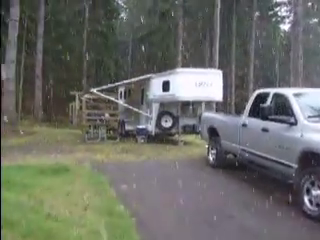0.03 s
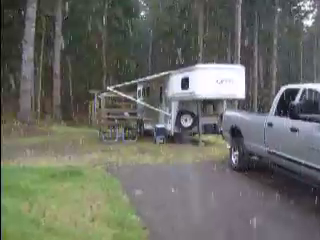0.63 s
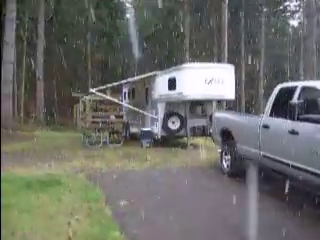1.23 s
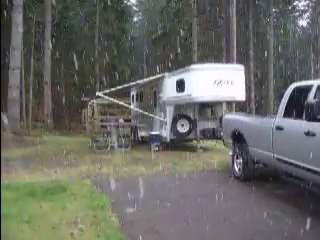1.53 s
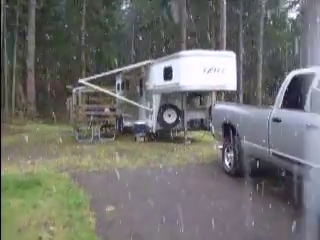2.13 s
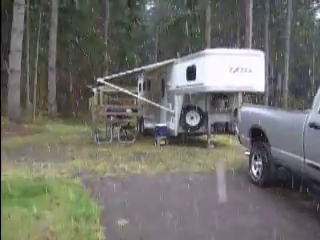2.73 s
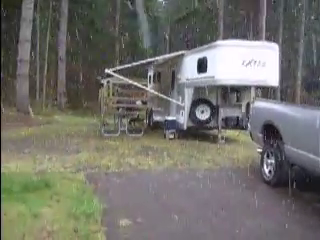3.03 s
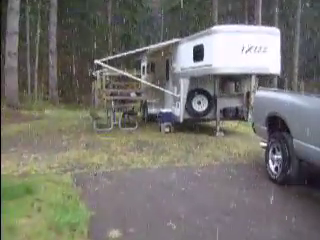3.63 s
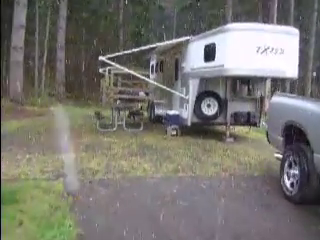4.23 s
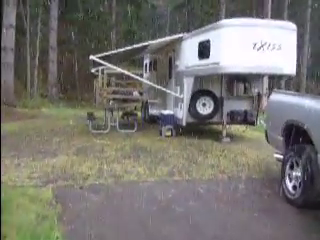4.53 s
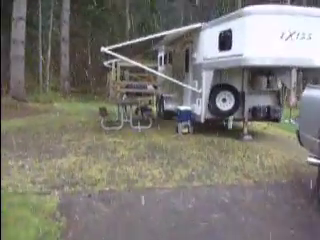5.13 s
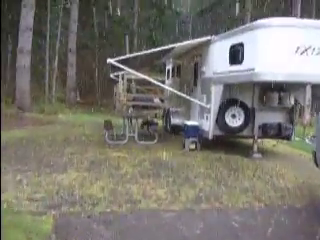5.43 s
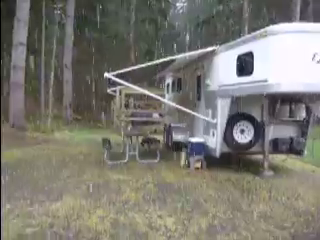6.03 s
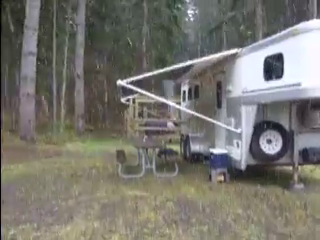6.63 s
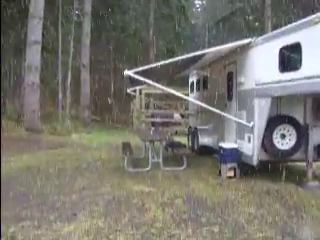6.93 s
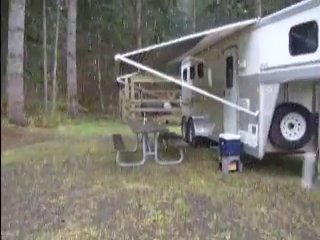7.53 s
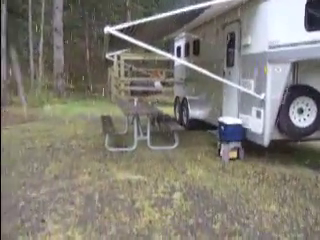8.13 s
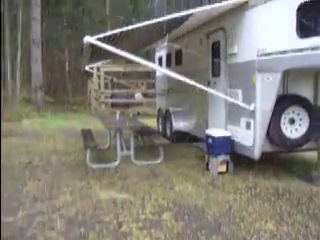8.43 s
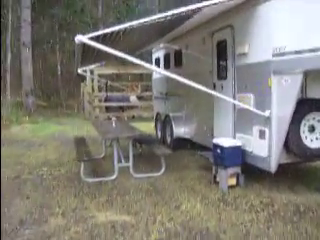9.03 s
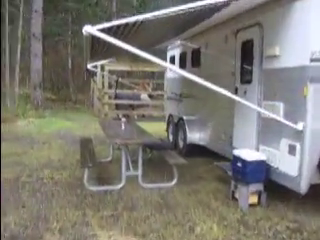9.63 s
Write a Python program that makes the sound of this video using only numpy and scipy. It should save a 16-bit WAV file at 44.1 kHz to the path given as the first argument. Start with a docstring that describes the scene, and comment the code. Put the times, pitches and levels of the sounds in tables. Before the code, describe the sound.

Sharp, irregular drips strike the microphone amid soft pops, rumbling gusts and short spells of light rain hiss.

```python
"""Rain at a camp in wet woods, heard through a hand-held camcorder that is itself getting wet.
Drops crack on its housing and make it ring, and puffs of air rumble on the microphone.
The sound cuts in with a soft pop, or when a tap or gust opens the noise gate, and sags out again.
So the rain, the hiss and part of the motor's whine come in short spells over a faint steady noise.
Late on, a quiet hum swells and fades."""
import sys
import numpy as np
from scipy import signal
from scipy.fft import rfft, irfft
from scipy.io import wavfile
from scipy.ndimage import uniform_filter1d, minimum_filter1d

SR = 44100
rng = np.random.default_rng(int(sys.argv[2]) if len(sys.argv) > 2 else 0)


def file_out(sig):
    """Save sig as 16-bit WAV at sys.argv[1]."""
    # one column per channel
    cols = np.atleast_2d(sig).T
    # limit, then scale
    lim = np.clip(cols, -1, 1)
    pcm = np.round(lim * 32767).astype(np.int16)
    wavfile.write(sys.argv[1], SR, pcm)


N = 431298
T = np.arange(N) / SR
TOP_HZ = 11250  # where the treble ends


def undb(db):
    """Turn decibels into a number to multiply by."""
    return 10 ** (np.asarray(db) / 20)


def unit(x):
    """Scale a signal to an average strength (rms) of one."""
    return x / np.sqrt(np.mean(x ** 2))


def butter(x, hz, kind, order=2):
    """Keep the lows, the highs or a band in between."""
    return signal.sosfilt(signal.butter(order, np.minimum(hz, .45 * SR), kind, fs=SR, output="sos"), x)


def filtered_noise(hz, kind, length=N, order=2):
    """Low, high or band noise of strength one."""
    return unit(butter(rng.standard_normal(length), hz, kind, order))


def shaped_noise(points):
    """Noise of strength one that follows (Hz, dB) points and falls away beyond them."""
    hz, db = np.transpose(points)
    f = np.maximum(np.fft.rfftfreq(N, 1 / SR), 1)
    skirts = np.minimum(f / hz[0], 1) ** 2 * np.minimum(hz[-1] / f, 1) ** 2
    shape = undb(np.interp(np.log(f), np.log(hz), db))
    return unit(irfft(rfft(rng.standard_normal(N)) * skirts * shape, N))


def wander(rate):
    """A smooth random wobble that changes about rate times a second."""
    size = int(SR / rate)
    steps = np.repeat(rng.standard_normal(N // size + 1), size)
    return unit(uniform_filter1d(steps, size)[:N])


def bump(s, width):
    """A smooth hill that reaches one at time s."""
    return np.exp(-np.minimum(((T - s) / width) ** 2, 50))


def add(track, s, sound):
    """Mix a short sound in at time s."""
    i = max(int(s * SR), 0)
    track[i:i + len(sound)] += sound[:N - i]


# Soft pops as the microphone cuts in. Each row: start in seconds, voltage step in dB, hold in seconds.
POP_STEPS = [ (0.000, -18, 0.11), (0.559, -20.5, 0.12), (0.771, -18, 0.086), (1.0645, -20.5, 0.16),
             (1.4207, -19.5, .11), (1.7962, -22, 0.14), (2.1008, -18.5, 0.14), (2.38, -19.5, .12),
             (2.74, -21, 0.15), (3.5354, -19.5, .12), (4.1905, -20, 0.12), (4.339, -22.5, 0.21),
             (4.6153, -19, 0.094), (4.9593, -19.5, 0.13), (5.2497, -17.5, 0.076), (6.296, -19.5, 0.48),
             (7.17, -20, 0.15), (7.761, -19, .11), (8.595, -20.5, 0.13), (8.998, -19.5, .13),
             (9.5470, -18.5, 0.16)]
# Drops that land on the microphone itself and cut a pop short. Each entry: time in seconds.
KNOCK_TIMES = [0.034, 0.862, 2.1205, 4.3714, 4.699, 5.325, 6.404]

def pops(snap_s=0.00055, creep_s=0.034, creep_share=0.54, collapse_s=0.0032, kick=0.41,
         fade_s=0.015, sag_s=0.031, gain_db=16.5, fully_open_db=-20):
    """The microphone's sensitivity and voltage jump, hold and sag; a knock kicks the voltage out."""
    sensitivity, voltage, t = np.zeros(N), np.zeros(N), T[:SR]
    rise = 1 - (1 - creep_share) * np.exp(-t / snap_s) - creep_share * np.exp(-t / creep_s)
    for s, step_db, hold_s in POP_STEPS:
        held = lambda fall_s: undb(step_db) * (1 - np.tanh((t - hold_s) / (2 * fall_s))) / 2
        next_knock = min((when - s for when in KNOCK_TIMES if when > s), default=1)
        collapse = np.where(t < next_knock, 1, (1 + kick) * np.exp(-np.abs(t - next_knock) / collapse_s))
        add(voltage, s, held(fade_s) * rise * collapse)
        add(sensitivity, s, held(sag_s))
    return undb(gain_db) * np.minimum(sensitivity, undb(fully_open_db)), voltage


# The tone of rain on ground and trees. Each row: frequency in Hz, relative level in dB.
WASH_TONE = [(50, 9), (150, -2), (330, -1.5), (480, -6.5), (800, -0.5), (1150, -10), (1600, -10),
             (2400, -14.5), (5000, -14), (11000, -17.5)]
# Brief swells in the rain. Each row: middle in seconds, half length in seconds, pitch in Hz, level in dB.
RAIN_SWELLS = [(0.955, 0.031, 1200, -47.5), (6.15, 0.053, 1530, -50.5), (6.66, 0.084, 770, -49.5),
               (7.191, 0.012, 303, -43.5)]

def rain(wash_db=-53.5, flicker_db=3.27, patter_db=-57, per_second=260, patter_hz=950, ring_cycles=1.63):
    """Distant rain blurs into a wash with brief swells; single drops patter on the ground nearby."""
    patter, t = np.zeros(N), T[:SR // 50]
    count = int(per_second * N / SR)
    starts = rng.uniform(0, N / SR, count)
    for s, (size, pitch) in zip(starts, np.clip(rng.standard_normal((count, 2)), -2, 2)):
        cycles = patter_hz * 2 ** (.6 * pitch) * t
        add(patter, s, undb(5 * size) * np.sin(2 * np.pi * cycles) * np.exp(-cycles / ring_cycles))
    swells = sum(undb(db) * bump(s, width) * filtered_noise([hz / 1.52, hz * 1.39], "band")
                 for s, width, hz, db in RAIN_SWELLS)
    wash = undb(wash_db + flicker_db * wander(17)) * shaped_noise(WASH_TONE)
    return wash + undb(patter_db) * unit(patter) + swells


def background(hiss_db=-51.5, floor_db=-66.5, flutter_db=2):
    """Two noises: an even hiss, and a much fainter floor that flutters."""
    hiss = undb(hiss_db) * filtered_noise(TOP_HZ, "low", order=8)
    floor_level = undb(floor_db + flutter_db * wander(90))
    return hiss, floor_level * shaped_noise([(30, 14), (150, 1), (400, -1.5), (2000, -2.5), (11000, -3)])


# The whine's tones. Each row: pitch in Hz, level in dB, share that skips the microphone (0 to 1).
MOTOR_TONES = [(5362, -81, .7), (5561, -68, .52), (7834, -67, .03), (7894, -67, .03), (10926, -65, .22),
               (11123, -67, .22)]

def motor_whine(openness, waver=0.00043, flicker_db=2):
    """Thin, unsteady motor tones arrive partly through the microphone, partly straight by the circuit."""
    out = 0
    for hz, db, direct in MOTOR_TONES:
        phase = 2 * np.pi * np.cumsum(hz * (1 + waver * wander(60))) / SR
        tone = undb(db + flicker_db * wander(45)) * np.sqrt(2) * np.sin(phase)
        out = out + tone * (direct + (1 - direct) * openness)
    return out


# The housing's own notes. Each row: pitch in Hz, relative level in dB, seconds to fade by 60 dB.
HOUSING_NOTES = [(705, -11, .055), (770, -9, .055), (870, -12, .045), (1210, -6, .045), (1315, -4, .04),
                 (1540, -9, .035), (1776, -7, .035), (2088, -5, .03), (2487, -5, .03), (2680, -7, .025),
                 (2928, 0, .028), (3197, -4, .022), (3488, -9, .02), (4554, -4, .015)]

def housing_ring(t, ring_db=5, detune=0.04):
    """The struck housing rings; every spot on it gives a slightly different mix of notes."""
    hz, db, fade_s = np.transpose(HOUSING_NOTES)
    gain = undb(ring_db + db + rng.standard_normal(len(hz))) * (-1) ** np.arange(len(hz))
    pitch = hz * (1 + detune * rng.standard_normal(len(hz)))
    return gain @ (np.sin(2 * np.pi * np.outer(pitch, t)) * undb(-60 * np.outer(1 / fade_s, t)))


# Drops on the housing, plus the click at 0.77 s as a pop cuts in. Each row: start in seconds, peak level in dB,
# Hz above which the treble fades.
HOUSING_DROPS = [ (0.0342, -30.5, 1310), (0.112, -34.5, 1790), (0.242, -23.5, 970), (0.7717, -37, 1140),
                 (0.8612, -21.5, 1030), (1.4222, -27, 1840), (2.1211, -11.5, 4760), (2.7397, -20.5, 2670),
                 (3.3985, -17.5, 2580), (3.4363, -26.5, 1030), (3.9976, -13, 2970), (4.0473, -27.5, 1120),
                 (4.08, -44.5, 990), (4.3699, -43, 900), (4.4098, -31.5, 1420), (4.6980, -8, 6540),
                 (5.3265, -8, 6700), (5.978, -23, 880), (5.9937, -6.5, 8600), (6.404, -37, 2170),
                 (6.6356, -24.5, 960), (6.649, -10, 11000), (7.8557, -32.5, 805), (7.943, -46, 1700),
                 (8.474, -54, 741), (8.5935, -22, 2100), (9.0038, -27.5, 1070), (9.0730, -33, 950)]

def drops(crack_db=27.5, rebound=0.24, rebound_s=0.000663, knock_db=17, knock_hz=3100, knock_s=0.00023,
          push_db=24.5, push_s=0.00011, rattle_db=3, rattle_s=0.053, spray_db=2, spray_s=0.019):
    """Each drop cracks, bounces and sprays, and the housing knocks and rings; soft hits sound dull."""
    out, t = np.zeros(N), T[:SR // 12]
    crack = butter(1. * (t == 0), [2200, 8500], "band")
    crack = undb(crack_db) * crack / np.abs(crack).max()
    crack = crack + rebound * np.interp(t - rebound_s, t, crack, left=0)
    # the hollow over the microphone swings for only a few cycles
    knock = undb(knock_db) * t / knock_s * np.exp(1 - t / knock_s) * np.cos(2 * np.pi * knock_hz * t)
    push = undb(push_db) * t / push_s * np.exp(1 - t / push_s)
    for s, peak_db, bright_hz in HOUSING_DROPS:
        ring = housing_ring(t)
        # the housing's many weaker notes blur into a short rattle
        rattle = filtered_noise([1100, 4000], "band", len(t)) * undb(rattle_db - 60 * t / rattle_s)
        spray = filtered_noise(4100, "high", len(t)) * undb(spray_db - 60 * t / spray_s)
        softness = min(800 / bright_hz, 1) ** 2  # a slow, soft drop pushes more than it cracks
        hit = butter(crack + knock + ring + rattle + spray + push * softness, bright_hz, "low")
        add(out, s, undb(peak_db) * hit / np.abs(hit).max())
    return out


# Puffs of air. Each row: middle in seconds, relative level in dB, half length in seconds.
AIR_PUFFS = [ (0.096, -26, 0.021), (0.179, -26, 0.017), (0.298, -24.5, 0.076), (0.413, -34, 0.06),
             (0.929, -37.5, 0.041), (1.178, -50, 0.075), (1.87, -33.5, 0.031), (2.237, -31, 0.036),
             (3.44, -46, 0.027), (4.07, -43, 0.061), (4.42, -35.5, 0.06), (4.833, -38, 0.037),
             (5.474, -29, .07), (5.58, -19, 0.038), (5.672, -24.5, 0.064), (5.813, -30, 0.19),
             (6.053, -36, 0.025), (6.148, -41, 0.072), (6.465, -47.5, 0.03), (6.626, -29, 0.072),
             (6.72, -50, 0.083), (6.89, -36.5, 0.029), (6.987, -30.5, 0.043)]
# The tone of their rumble. Each row: frequency in Hz, relative level in dB.
RUMBLE_TONE = [(12, -20), (20, 12.5), (42, 4), (65, 0.5), (122, -18), (238, -28), (500, -47), (650, -62),
               (1100, -120)]

def gusts(gain_db=-1):
    """Air rumbles on the microphone, each puff swelling and dying at the same pace."""
    level = sum(undb(db) * bump(s, width) for s, db, width in AIR_PUFFS)
    return undb(gain_db) * level * np.tanh(shaped_noise(RUMBLE_TONE))


# Low thumps. Each row: middle in seconds, peak level in dB, half length in seconds.
LOW_THUMPS = [(0.144, -34, 0.0013), (0.188, -29, 0.0028), (0.385, -26, 0.0031), (5.589, -20.5, 0.0029),
              (5.591, -33.5, 0.0012), (5.666, -17.5, 0.0066), (5.808, -36, 0.0017), (5.9, -36, .001),
              (6.041, -23, 0.0091), (6.527, -36, 0.00079), (7.188, -34, 0.00098), (9.006, -35.5, 0.0014)]

def thumps():
    """Each thump is one swing of pressure on the microphone, down and then up."""
    return sum(undb(db) * np.sqrt(2 * np.e) * (T - s) / width * bump(s, width)
               for s, db, width in LOW_THUMPS)


def noise_gate(sound, open_db=-53, knee_db=5.5, sense_s=0.0098, hold_s=0.0089,
               fall_db_per_s=260, duck_db=-20):
    """Gusts and taps open the gate, louder ones for longer; the loudest swells turn it down again."""
    sense, hold, fall = int(sense_s * SR), int(hold_s * SR), fall_db_per_s * T
    level = uniform_filter1d(np.abs(sound), sense, origin=(sense - 1) // 2)
    recent_peak = -minimum_filter1d(-np.abs(level), hold, origin=(hold - 1) // 2)
    # jumps up at once, then sinks at a steady pace
    level_db = np.maximum.accumulate(20 * np.log10(recent_peak + 1e-9) + fall) - fall
    opening = (1 + np.tanh((level_db - open_db) / (2 * knee_db))) / 2
    swell = uniform_filter1d(np.abs(sound), SR // 8)
    return opening / (1 + swell / undb(duck_db))


# Short dips in level. Each row: middle in seconds, half length in seconds.
LEVEL_DIPS = [(3.294, 0.015), (7.717, 0.011), (8.282, 0.013), (8.451, 0.0091), (8.506, 0.02),
              (8.576, 0.016), (9.524, 0.0097)]

def dips(depth_db=-20):
    """The level dips briefly and comes back."""
    return undb(depth_db * sum(bump(s, width) for s, width in LEVEL_DIPS))


def hum(hz=193, db=-56, middle_s=7.02, width_s=0.61, waver=0.0314):
    """A faint, wavering hum swells and fades."""
    level = undb(db + 2 * wander(25)) * bump(middle_s, width_s)
    return level * np.sin(2 * np.pi * np.cumsum(hz * (1 + waver * wander(27))) / SR)


def scene(gate_db=-0.78):
    """Rain and hiss come through during a pop, or while taps and gusts hold the gate open."""
    sensitivity, pop_voltage = pops()
    blows = drops() + gusts() + thumps()
    openness = np.maximum(sensitivity, undb(gate_db) * noise_gate(blows))
    hiss, floor = background()
    bed = dips() * (openness * (rain() + hiss) + floor + motor_whine(openness))
    return (bed + hum() * np.sqrt(openness + 0.0076) + blows + pop_voltage)[None]


def record(dry, drain_hz=1.6):
    """A capacitor in the signal's path lets each voltage step drain away; the treble ends steeply."""
    drained = butter(dry, drain_hz, "high", order=1)
    return signal.sosfilt(signal.ellip(8, .2, 70, TOP_HZ, fs=SR, output="sos"), drained)


dry = scene()
out = record(dry)
file_out(out)
```